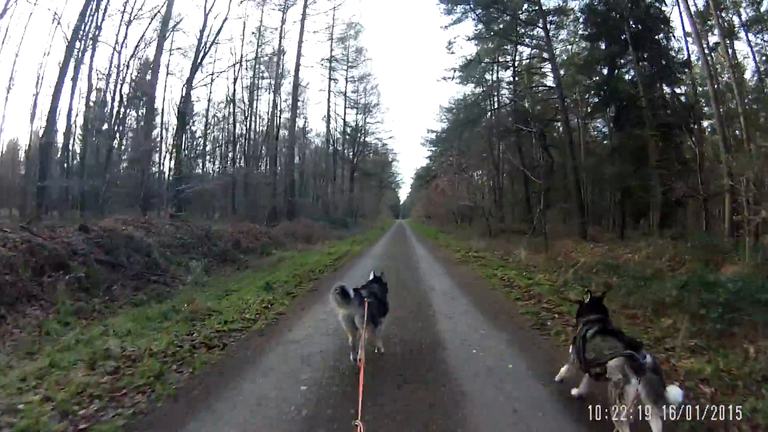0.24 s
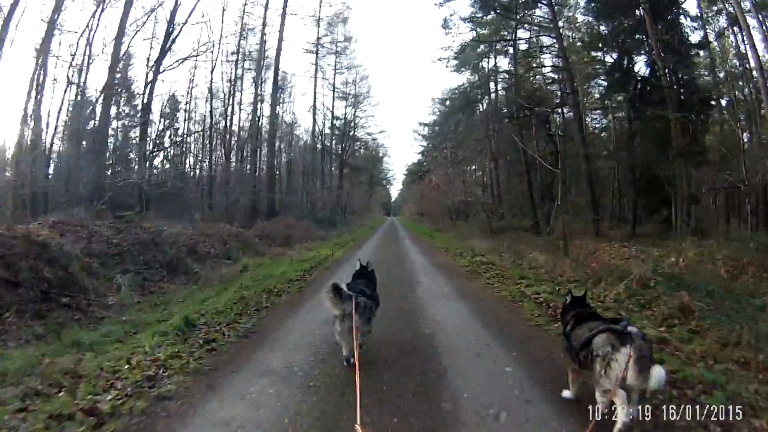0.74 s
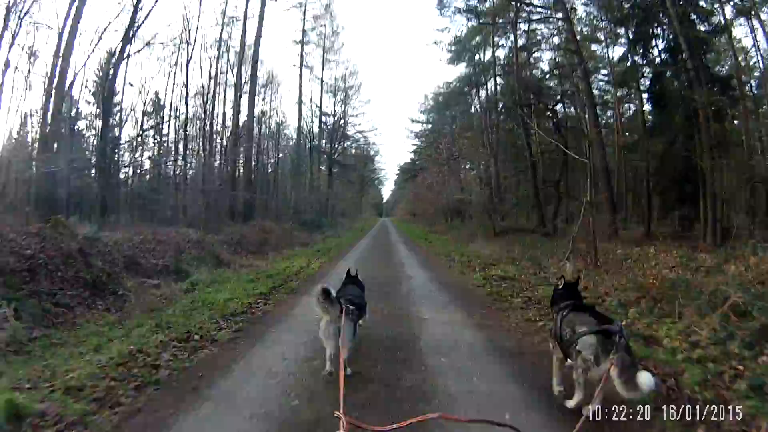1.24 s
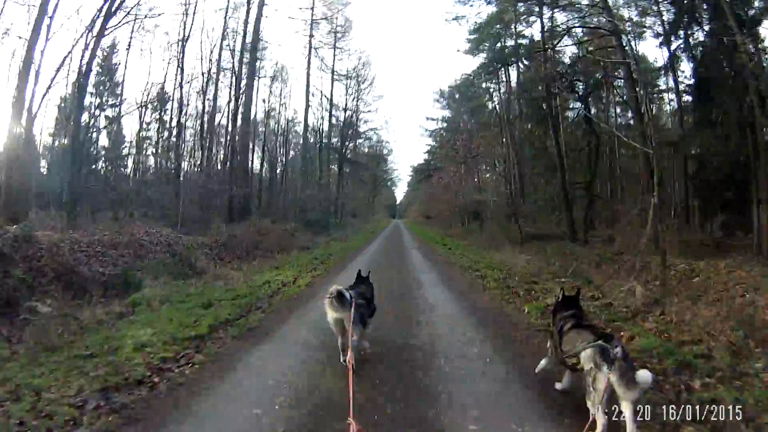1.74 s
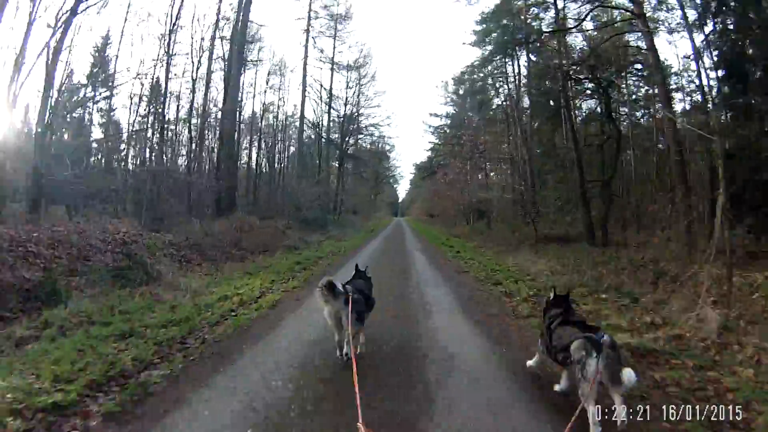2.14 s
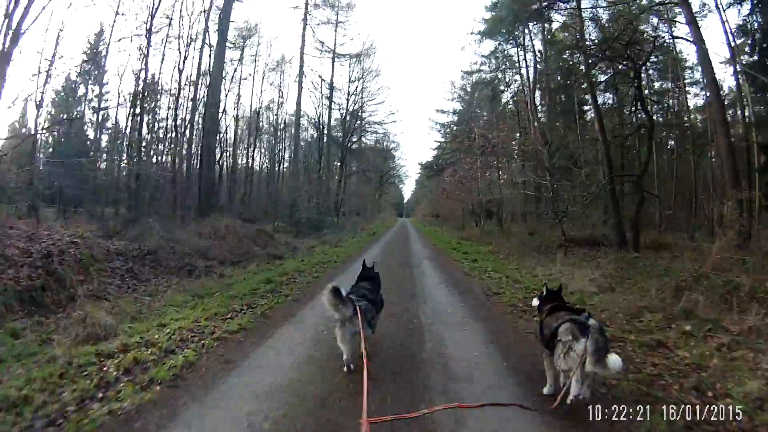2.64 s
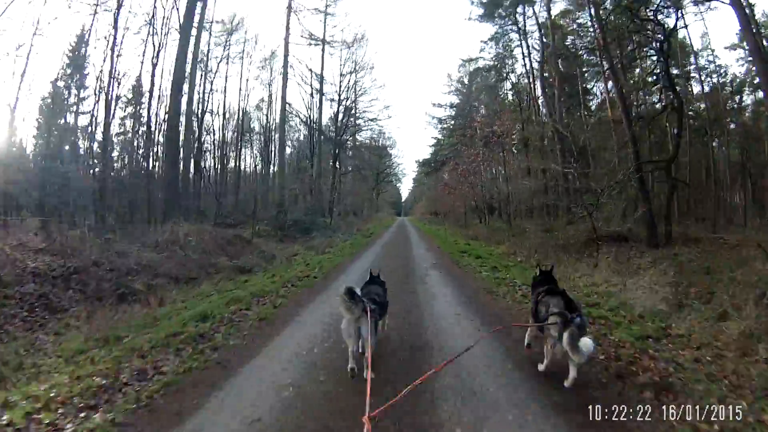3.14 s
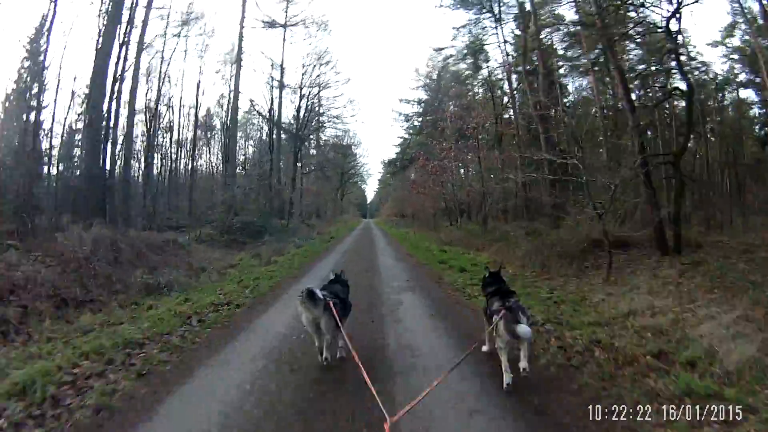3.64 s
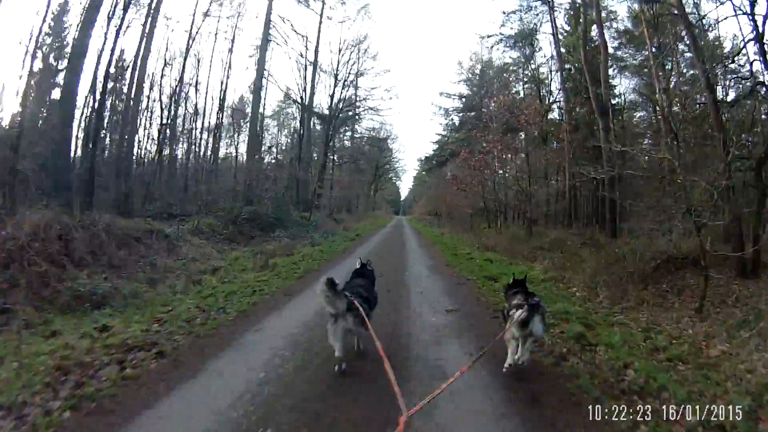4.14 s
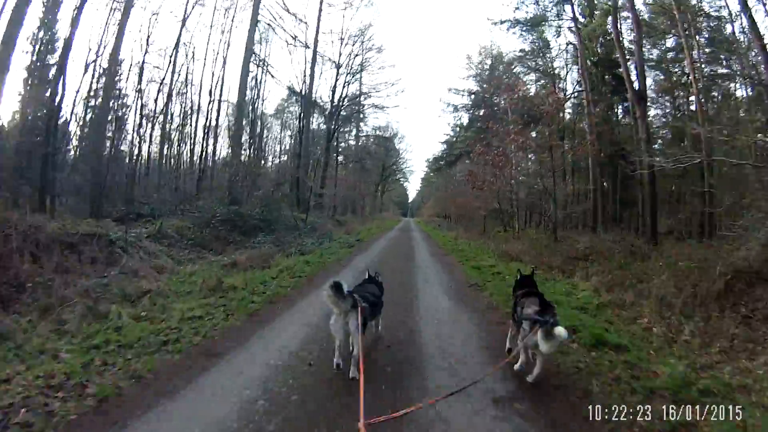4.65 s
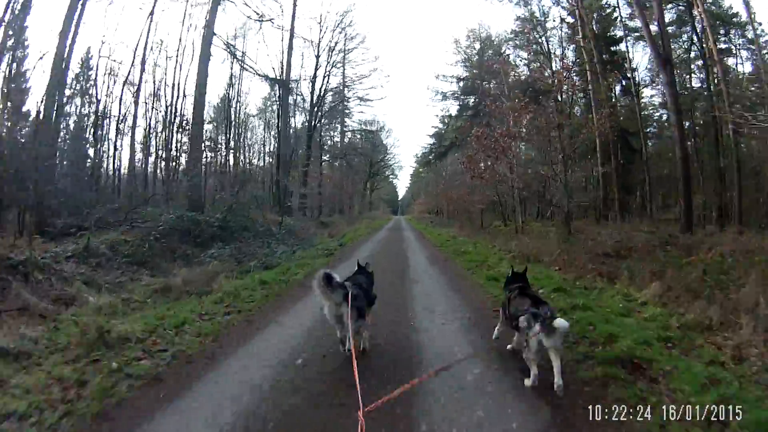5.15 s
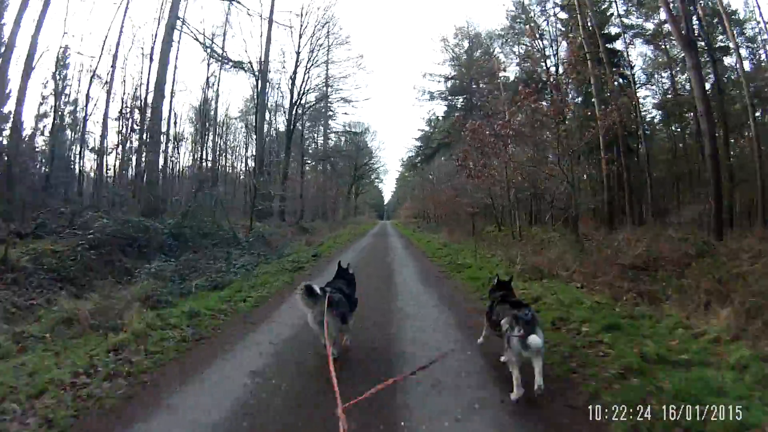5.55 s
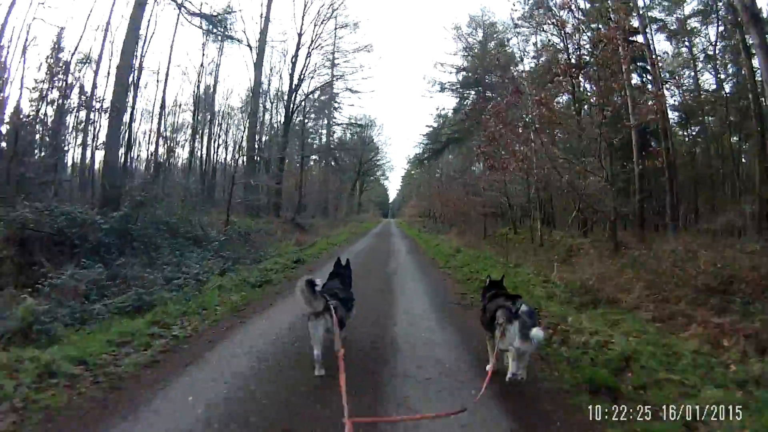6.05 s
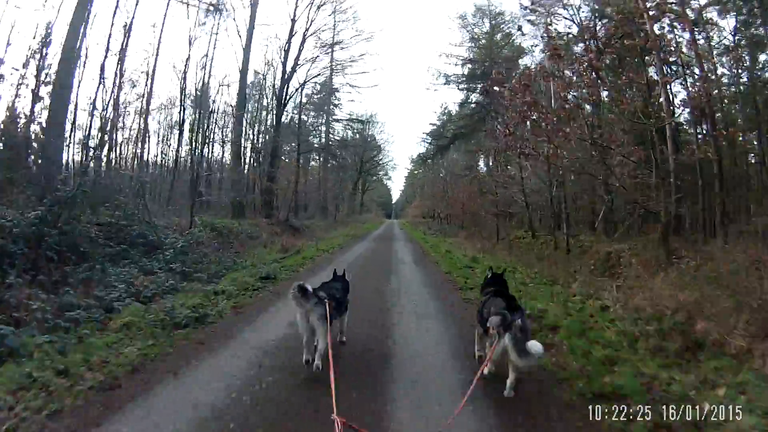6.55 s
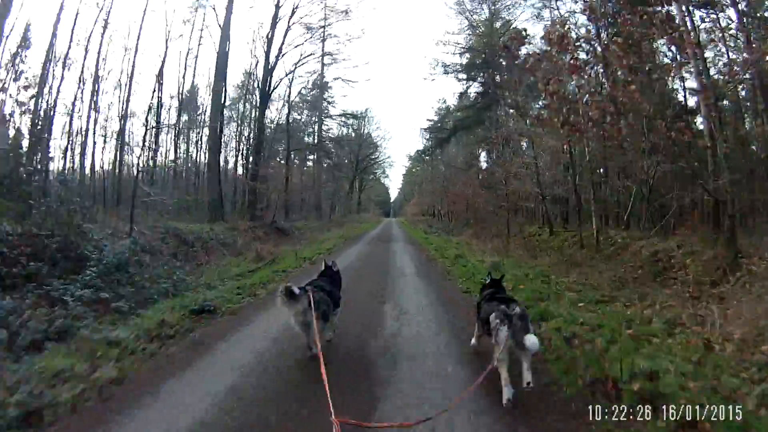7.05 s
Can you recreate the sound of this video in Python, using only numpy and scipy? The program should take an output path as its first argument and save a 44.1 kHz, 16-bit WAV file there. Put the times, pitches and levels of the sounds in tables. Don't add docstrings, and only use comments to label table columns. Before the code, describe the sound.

Low, bumpy tyre rumble with crunching grit, rapid irregular metallic ticks and occasional stone knocks, heard closely from a scooter's handlebar.

```python
import sys
import numpy as np
from scipy import signal
from scipy.fft import rfft, irfft
from scipy.io import wavfile
from scipy.ndimage import uniform_filter1d

SR = 44100
rng = np.random.default_rng(int(sys.argv[2]) if len(sys.argv) > 2 else 0)


def int16_out(signal):
    q = np.round(np.clip(np.atleast_2d(signal).T, -1, 1) * 32767)
    wavfile.write(sys.argv[1], SR, q.astype(np.int16))


def undo_db(level):
    steps = np.asarray(level, float) / 20
    return 10 ** steps


N = 321930

# (time [s], level [dB])
ROAD = [(0.0, -25), (0.04, -29.5), (0.77, -28), (4.63, -28.5), (4.67, -25.5), (4.7, -27), (5.85, -30),
        (5.9, -26.5), (6.89, -30), (7.08, -27), (7.14, -31), (7.3, -28.5)]
# (frequency [Hz], width [Hz], level [dB])
SWAY_MODES = [(43.6, 46, -3), (66.7, 14, -4)]
BOOM_MODES = [(112.3, 8.4, -7.5), (171.2, 17.5, 3.5)]
TUBE_MODES = [(228.2, 37, -5.5), (275, 33, 2), (303.1, 47.4, 5.5), (363, 35, -0.5), (412.3, 18.4, -2),
              (449.2, 18.6, -9.5), (513, 22, -22)]
# (time [s], peak [dB], frequency [Hz])
BUMPS = [(-0.0042, -12, 275), (0.051, -22, 283), (0.56, -43, 289), (0.61, -48, 424), (0.741, -18.5, 297),
         (0.784, -16, 311), (0.824, -17.5, 326), (1.269, -16.5, 316), (1.397, -17, 275),
         (1.591, -18.5, 323), (1.654, -16, 311), (2.041, -20.5, 333), (2.2, -17, 303), (2.495, -24, 283),
         (2.535, -16.5, 311), (2.719, -17, 282), (2.872, -18.5, 275), (3.206, -17, 275), (4.008, -21, 317),
         (4.532, -19.5, 286), (4.659, -14.5, 289), (4.785, -18.5, 288), (5.661, -22, 389),
         (5.862, -22, 280), (6.003, -17.5, 355), (6.149, -25, 287), (6.653, -19, 275), (6.923, -24.5, 365),
         (7.028, -17.5, 307), (2.262, -23, 302), (3.035, -19, 306), (3.79, -21.5, 285), (3.92, -21.5, 309),
         (2.085, -25, 540), (3.16, -26.5, 529), (5.42, -24.5, 400), (.43, -27, 519)]
# (time [s], peak [dB], frequency [Hz])
THUMPS = [(0.101, -26.5, 171), (0.189, -24.5, 161), (0.572, -29, 175), (0.66, -21.5, 175),
          (0.745, -26, 175), (0.983, -25, 156), (1.079, -25, 167), (1.235, -26, 166), (1.493, -30, 159),
          (1.704, -25, 170), (1.846, -25, 166), (2.047, -25, 178), (2.259, -23.5, 170.5), (2.543, -24, 178),
          (2.72, -23, 159.5), (2.891, -25.5, 181), (2.965, -26, 186), (3.44, -24, 178), (3.707, -22, 161.5),
          (3.85, -28, 180), (3.979, -23, 181.4), (4.093, -24, 176), (4.161, -26.5, 148), (4.289, -25, 172),
          (4.431, -27, 173), (4.667, -22, 182), (4.876, -31, 175), (5.004, -31, 161), (5.076, -30, 178),
          (5.198, -24.5, 165), (5.58, -26, 167), (5.751, -28, 168), (5.974, -24, 170), (6.948, -25, 163),
          (7.042, -22, 170), (7.177, -28, 150)]
# (time [s], peak [dB])
RUTS = [(.022, -29.5), (.13, -27), (.281, -29), (.93, -27), (1.03, -30), (1.269, -36), (1.839, -34),
        (2.06, -26.5), (2.25, -33), (2.484, -32.5), (3.43, -29), (3.603, -29), (3.855, -35), (4.11, -32),
        (4.545, -30), (5.29, -35), (5.74, -25), (6.151, -34), (6.462, -30), (6.62, -29), (7.158, -32)]
# (frequency [Hz], density [dB/Hz])
HISS = [(350, -4), (560, 1.5), (700, -0.5), (900, -4.5), (1230, -6), (1500, -9), (3000, -14.5), (3500, -21),
        (5000, -21.5), (5750, -18), (6300, -20.5), (7500, -27), (10000, -29.5), (15300, -30.5)]
# (time [s], level [dB])
LOOSE_GRIT = [(0.0, -49.5), (0.47, -50.5), (1.2, -48.5), (1.95, -53), (3.5, -49), (3.8, -52), (4.65, -50),
              (4.8, -52), (5.53, -50.5), (6.06, -49), (6.34, -51.5), (7.3, -53)]
# (pitch [Hz], level [dB])
GRIT_SIZES = [(650, -6.0), (900, -10.5), (1300, -13.0), (1800, -10.5), (2400, -10.5), (3100, -10.0), (4600, -18)]
# (frequency [Hz], level [dB])
WHINE = [(10519, -80)]
# (time [s], peak [dB])
TICKS = [(0.0388, -45), (0.0528, -25), (0.0977, -35), (0.1161, -29), (0.1815, -22.5), (0.2106, -16.5),
         (0.2615, -16), (0.2902, -31), (0.325, -19), (0.403, -29.5), (0.4583, -21.5), (0.5447, -24.5),
         (0.6404, -25.5), (0.6746, -25), (0.7003, -27.5), (0.7425, -13.5), (0.7934, -29.5),
         (0.925, -25.5), (0.9603, -22.5), (0.9981, -23.5), (1.0306, -30), (1.0764, -25),
         (1.0994, -25.5), (1.1423, -28), (1.267, -23.5), (1.2989, -28), (1.3212, -29), (1.3648, -16),
         (1.3982, -22), (1.4524, -24.5),
         (1.5816, -38), (1.5977, -24.5), (1.6705, -23.5), (1.7153, -24), (1.7528, -25), (1.766, -38),
               (1.8232, -29), (1.8992, -19), (1.9634, -30), (2.063, -25), (2.0858, -24.5), (2.12, -26.5),
               (2.1776, -19.5), (2.2985, -21), (2.3354, -33.5), (2.4412, -28.5), (2.471, -22), (2.515, -34),
               (2.5884, -30), (2.6516, -21), (2.6908, -32.5), (2.7864, -34.5), (2.8843, -30), (2.9083, -18),
               (2.971, -19.5), (3.0152, -29), (3.0877, -24), (3.1479, -17.5), (3.199, -23.5), (3.2537, -27),
         (3.3075, -22), (3.3415, -26), (3.3663, -18), (3.4285, -18.5), (3.4782, -25), (3.6352, -30),
              (3.6928, -25.5), (3.7454, -35), (3.788, -23.5), (3.834, -22.5), (3.883, -32), (3.9486, -21.5),
              (4.058, -24.5), (4.107, -25.5), (4.1429, -33.5), (4.2579, -20.5), (4.3222, -24.5),
              (4.4013, -22.5), (4.44, -19.5), (4.5024, -21), (4.53, -24.5), (4.5846, -23.5), (4.6123, -40),
              (4.7203, -20.5), (4.7686, -21), (4.8049, -20.5), (4.8418, -24), (4.8865, -34), (4.948, -26.5),
              (4.9896, -30.5),
         (5.1098, -21), (5.1407, -25), (5.1874, -24.5), (5.2511, -22.5), (5.323, -30), (5.3891, -18.5),
             (5.453, -15.5), (5.497, -25), (5.5536, -22), (5.5956, -32), (5.662, -31.5), (5.6821, -24.5),
             (5.7209, -20), (5.7648, -33), (5.878, -29), (5.9716, -22.5), (6.145, -26), (6.1931, -27),
             (6.3613, -31.5), (6.4083, -34), (6.461, -31), (6.4923, -28.5), (6.6344, -28.5), (6.7632, -28),
             (6.8218, -23), (6.8606, -27.5), (6.956, -29), (7.0893, -29.5), (7.1641, -31.5),
             (7.2073, -27.5),
         (0.0118, -27.5), (0.471, -19.5), (.7464, -21), (.7559, -35), (1.0793, -22), (0.88, -32),
           (1.196, -34), (6.6565, -43), (6.667, -43), (6.707, -40), (6.7163, -42), (9.4, -35),
           (2.2036, -38), (3.8, -27), (6.3, -39), (6.996, -33.5), (7.2844, -34.5), (4.0222, -31.5),
           (6.0099, -34)]
CHATTER = [.206, 0.232, .4852, .5021, 0.566, .5761, .8417, .877, 1.5117, 1.6286, 2.2626, 2.36, 2.4045,
           2.5529, 2.6134, 2.7301, 2.7447, 2.8406, 2.9276, 3.2851, 3.5394, 4.1725, 4.6523, 5.035, 5.2724,
           5.9263, 6.074, 6.0831, 6.2874, 6.525]
# (time [s], extra brightness [dB])
GLANCING = [(.0123, 6), (.2104, 12), (.7464, 7), (.9981, 8), (1.0762, 10), (1.0793, 25), (1.0993, 15),
            (2.0868, 17), (3.3418, 29), (5.662, -8), (6.0099, -8)]
# (frequency [Hz], level [dB], t60 [s])
BAR_MODES = [(3475, -16, 0.037), (3900, -3, 0.0073), (5008, -16.5, 0.021), (3777, -19, 0.04),
             (6305, -9.5, 0.0096), (6978, 6, 0.0015), (7986, -14, 0.011), (9500, -14, 0.0018),
             (11770, -10.5, 0.0027), (12800, -26, 0.007), (14700, -28.5, 0.0032)]
# (time [s], peak [dB], frequency [Hz])
STONES = [(.264, -30, 1880), (.3526, -35, 1760), (.4083, -33.5, 2030), (.7457, -26, 2400),
          (1.143, -32, 2300), (1.389, -31, 1260), (1.5821, -29, 2350), (1.667, -9, 2500),
          (1.683, -29, 1880), (1.7674, -6.5, 1850), (1.7768, -19, 2300), (2.0129, -34, 2170),
          (2.0782, -28, 2410), (2.0966, -24, 1770), (2.6012, -26.5, 2330), (3.451, -33, 1950),
          (3.5444, -22, 1900), (4.0792, -27, 2180), (4.1058, -31, 2010), (4.1663, -26, 2390),
          (4.613, -29, 2320), (4.653, -31, 2310), (5.2155, -26.5, 2220), (5.809, -27.5, 2650),
          (5.8866, -22.5, 2460), (5.891, -22, 2340), (5.9318, -25, 2370), (5.965, -27, 2270),
          (6.1798, -26.5, 2170), (6.2565, -33, 2060), (.349, -31, 2850), (.598, -35, 2260),
          (1.042, -36, 2800), (1.153, -34, 3000), (1.7539, -38, 1890), (2.2463, -33, 2820),
          (4.3036, -31, 2740), (4.4024, -33, 2460), (6.777, -33, 1950), (6.9197, -32, 2020),
          (7.144, -37, 2500), (7.194, -32.5, 3100), (7.247, -30, 2900), (2.0083, -31, 2940),
          (5.6605, -28, 2480)]
PEBBLES = [.0392, 1.317, 1.367, 1.377, 1.6279, 2.01, 2.017, 2.159, 2.1896, 2.821, 3.0848, 3.557, 4.339,
           4.5648, 4.5746, 4.6608, 5.453, 5.9278, 5.9792, 7.0531, 7.213]
# (time [s], peak [dB], frequency [Hz])
FLICKS = [(0.0613, -32, 2550), (0.0674, -39, 2780), (0.1391, -45, 2530), (0.1545, -41, 2000),
          (0.2307, -37, 2420), (0.294, -39, 2560), (1.0554, -44, 2890), (1.066, -36, 2400),
          (1.1664, -42, 2550), (1.6277, -32, 2200), (2.73, -35, 2450), (2.9057, -33, 3160),
          (3.0214, -38, 2640), (3.1884, -35, 2480), (3.2655, -42, 2580), (5.6496, -28, 2200),
          (5.6972, -35, 2260), (5.7864, -33, 2460), (5.8124, -33, 3050), (5.8254, -46, 2320),
          (5.8346, -38, 2530), (5.8616, -40, 2830), (5.9426, -28, 2660), (6.0447, -43, 2950),
          (6.0911, -37, 2380), (6.2123, -37, 2770), (6.7414, -44, 2500), (7.0379, -37, 2260),
          (7.1776, -38, 2220)]
# (time [s], peak [dB], frequency [Hz], t60 [s])
KNOCKS = [(0.21, -20, 890, 0.024), (0.471, -25, 854, 0.043), (0.641, -27.5, 1193, 0.047),
          (0.824, -28.5, 1060, 0.037), (1.193, -24, 1230, 0.014), (1.273, -30, 1670, 0.036),
          (1.592, -19, 1845, 0.03), (2.085, -20.5, 2250, 0.017), (3.205, -27, 1140, 0.035),
          (4.005, -30.5, 956, 0.02), (5.156, -27, 1105, 0.032), (5.663, -19.5, 1246, 0.022),
          (6.015, -32, 830, 0.056), (6.482, -22, 1170, 0.039), (6.846, -26, 1760, 0.024),
          (7.067, -26.5, 2180, 0.03), (7.229, -25.5, 2173, 0.043), (7.233, -27, 2094, 0.04),
          (1.387, -32, 1270, 0.033), (2.183, -36, 990, 0.034), (2.302, -38, 1210, 0.037),
          (2.613, -32, 880, .03), (2.885, -35.5, 950, 0.038), (3.341, -31, 1260, .035),
          (3.952, -35, 1230, .04), (5.716, -35, 1210, .04), (6.016, -37, 1200, 0.045),
          (6.68, -36, 1130, .04), (6.95, -36.5, 1205, .1), (1.825, -40, 1200, .12), (5.03, -40, 1196, .12),
          (2.09, -29, 900, .02)]
# (time [s], peak [dB], frequency [Hz],
# t60 [s])
CLIPS = [(.268, -54, 7480, 0.051), (.752, -43, 7800, 0.044), (6.49, -56, 7700, .09),
         (5.903, -48, 5100, .03), (.838, -56, 9600, .09), (1.08, -54, 12300, .03), (3.1, -60, 9600, 0.1),
         (6.6, -46, 6600, .05), (7.221, -64, 9700, .04), (1.124, -56, 6000, .03), (1.18, -64, 7500, .08),
         (6.947, -48, 6100, .025), (.229, -48, 5000, .03), (1.0795, -22, 7300, .015),
         (7.052, -43, 6300, .012)]
DROPOUT_HZ = (13000, 13800, 14400, 14900)
DROPOUT_BELOW = (-2, -1.5, -1.1, -.5)

TUBE_DB, SWAY_DB, BOOM_DB, GRIT_DB = -1.5, -12, -5.5, 2
THUMP_DB, THUMP_T60_S = -1.5, 0.26
RUT_HZ, RUT_T60_S = 67.8, 0.55
LOAD_TOP = 1.47
DECK_TOP_HZ = 3800
TICK_DB, BRIGHT_DB, BRIGHT_PER_DB, DULLEST_DB = 2, -0.5, 1.08, -27
BOUNCE_S, BOUNCE_DB, BOUNCE_SPREAD_DB = 0.0097, -30, 3.5
CHATTER_DB, CHATTER_SPREAD_DB = -36, 2.5
CRACKLE_PER_S, CRACKLE_DB = 14, -45
COLOUR_SPREAD_DB, TILT_TOP_HZ = 1.5, 8500
EDGE_HZ, EDGE_PER_DB = 10500, 0.5
SCATTER = 0.043
PEBBLE_DB, PEBBLE_HZ, PEBBLE_SPREAD = -32.5, 2290, 0.078
FLICK_DB = 1.5
STONE_TURNS, TURNS_PER_DB, SHORTEST_TURNS = 0.47, 0.1043, 0.6
KNOCK_SNAP_DB, KNOCK_SNAP_RISE = 0.5, 0.77
TOP_HZ, DROPOUT_PER_S = 15150, 60


def curve(table, column):
    rows = np.array(table)
    return np.interp(np.arange(N) / SR, rows[:, 0], rows[:, column])


def unit(x):
    return x / np.sqrt(np.mean(x ** 2))


def band(x, hz, width_hz):
    return signal.lfilter(*signal.iirpeak(hz, hz / width_hz, fs=SR), x)


def steep(x, hz, kind, order=4):
    return signal.sosfilt(signal.butter(order, hz, kind, fs=SR, output="sos"), x)


def ring(hz, t60_s, late_s=0., rise_s=1e-5, size=4096):
    t = np.maximum(np.arange(size) / SR - late_s, 0)
    decay = np.exp(-np.log(1000) * t / t60_s)
    return np.sin(2 * np.pi * hz * t) * decay * (1 - np.exp(-t / rise_s)) ** 2


def snap(hz, turns):
    t = np.arange(-128, 128) / SR
    return np.sin(2 * np.pi * hz * t) * np.exp(-(2 * hz * t / turns) ** 2)


def add(out, s, sound):
    i = int(s * SR)
    sound = sound[max(-i, 0):]
    i = max(i, 0)
    out[i:i + len(sound)] += sound[:len(out) - i]


def walk(rate_hz):
    hold = int(SR / rate_hz)
    steps = np.repeat(rng.standard_normal(N // hold + 1), hold)
    return unit(uniform_filter1d(steps, hold)[:N])


def grit(rate_hz, spread_db):
    chance = rng.random((N, 2))
    size = undo_db(np.minimum(-spread_db * np.log(chance[:, 1] + 1e-9), 12))
    return (chance[:, 0] < rate_hz / SR) * size * rng.standard_normal(N)


def frame():
    push = grit(rate_hz=900, spread_db=1.5)
    push = np.append(push[-SR // 4:], push)
    out = np.zeros(N)
    for modes, part_db in ((TUBE_MODES, TUBE_DB), (SWAY_MODES, SWAY_DB), (BOOM_MODES, BOOM_DB)):
        part = 0
        for hz, width_hz, db in modes:
            mode = band(band(push, hz, 1.91 * width_hz), hz, 1.94 * width_hz)
            part = part + undo_db(db) * unit(mode)
        part = steep(part, 522, "low", order=10)[-N:]
        out += undo_db(curve(ROAD, column=1) + part_db) * unit(part)
    jolts = np.zeros(N + SR)
    for s, db, hz in BUMPS:
        jolt = ring(hz, 0.14, rise_s=0.00034) + 0.45 * ring(437, 0.084, rise_s=0.00073)
        add(jolts, s + .1, undo_db(db - 0.5) * jolt)
    for s, db, hz in THUMPS:
        add(jolts, s + .095, undo_db(db + THUMP_DB) * ring(hz, THUMP_T60_S, rise_s=0.0053, size=8192))
    for s, db in RUTS:
        add(jolts, s + .09, undo_db(db) * ring(RUT_HZ, RUT_T60_S, rise_s=0.012, size=16384))
    return out + steep(jolts, 596, "low", order=8)[SR // 10:][:N]


def housing_hiss():
    hz = np.fft.rfftfreq(N, 1 / SR)
    table = np.array(HISS)
    colour = undo_db(np.interp(np.log(hz + 1), np.log(table[:, 0]), table[:, 1]))
    hiss = irfft(rfft(rng.standard_normal(N)) * colour, N)
    hiss /= np.std(steep(hiss, [700, 3000], "band"))
    return undo_db(-54 + 1.4 * walk(16)) * hiss


def gravel(shaking):
    load = unit(uniform_filter1d(np.abs(shaking), size=500)) ** 1.2
    load = np.minimum(load, LOAD_TOP)
    clumps = undo_db(curve(LOOSE_GRIT, column=1) + GRIT_DB + 1.1 * walk(25)) * load
    cracks = 0
    for pitch_hz, db in GRIT_SIZES:
        burst = np.convolve(grit(rate_hz=300, spread_db=1.9), snap(pitch_hz, 1.23), "same")
        crumble = band(burst, pitch_hz, .12 * pitch_hz)
        burst = steep(burst, max(DECK_TOP_HZ, 1.3 * pitch_hz), "low", order=5)
        cracks = cracks + undo_db(db + 1.46 * walk(40)) * unit(unit(burst) + 0.59 * unit(crumble))
    deck = unit(band(cracks, 1180, 85))
    return clumps * (cracks + undo_db(-9.5) * deck)


def electronics():
    hz, db = WHINE[0]
    return undo_db(db + 3.0) * np.sin(2 * np.pi * hz * np.arange(N) / SR)


def contacts():
    s, db = np.array(TICKS).T
    luck = rng.standard_normal((2, len(s)))
    bounce_s = s + BOUNCE_S * (1 + 0.1 * luck[0])
    bounce_db = db + TICK_DB + BOUNCE_DB + BOUNCE_SPREAD_DB * luck[1]
    faint_db = CHATTER_DB + CHATTER_SPREAD_DB * np.clip(rng.standard_normal(len(CHATTER)), -1, 1)
    brush = rng.random((2, int(CRACKLE_PER_S * N / SR)))
    s = np.concatenate([s, bounce_s, CHATTER, brush[0] * N / SR])
    db = np.concatenate([db + TICK_DB, bounce_db, faint_db, CRACKLE_DB - 5 * brush[1]])
    bright_db = np.maximum(BRIGHT_DB + BRIGHT_PER_DB * db, DULLEST_DB)
    for at_s, extra_db in GLANCING:
        bright_db[np.argmin(np.abs(s - at_s))] += extra_db
    return np.array([s, db, bright_db]).T


def fitting():
    out = np.zeros(N)
    ticks = contacts()
    shakes = rng.standard_normal((len(ticks), 2, len(BAR_MODES)))
    scatter = rng.standard_normal((len(ticks), 512)) * np.exp(-np.arange(512) / (0.0036 * SR))
    blows = np.zeros(2048)
    add(blows, .00067, 0.2 * snap(4440, 4.4))
    add(blows, .0014, 1.32 * snap(4740, 2.05))
    for (s, db, bright_db), (shake, bend), tail in zip(ticks, shakes, scatter):
        tick = blows.copy()
        for k, (hz, mode_db, t60_s) in enumerate(BAR_MODES):
            tilt_db = 0.46 * (bright_db + 16.5) * np.log2(min(hz, TILT_TOP_HZ) / 4500)
            if hz > EDGE_HZ:
                tilt_db = EDGE_PER_DB * (db + 15.5)
            late_s = 0.002193 + 0.0014926 * np.sqrt(4000 / hz)
            size = min(int((late_s + t60_s) * SR), len(tick))
            mode = ring(hz + bend[k] / (6 * t60_s), t60_s, late_s, 0.00026, size)
            add(tick, 0, (-1) ** k * undo_db(mode_db + tilt_db + COLOUR_SPREAD_DB * shake[k]) * mode)
        echo = signal.fftconvolve(tick[100:260], tail)
        tick[140:] += SCATTER * echo[np.minimum(np.arange(1908), 670)]
        add(out, s - .0032, undo_db(db + 0.5) * tick / np.abs(tick).max())
    return steep(out, 3110, "high", order=10)


def light_stones():
    out = np.zeros(N)
    fade = np.exp(-np.arange(1024) / (0.0064 * SR))
    hits = STONES + [(s, db + FLICK_DB, hz) for s, db, hz in FLICKS]
    for s in PEBBLES:
        a, b = rng.standard_normal(2)
        hits = hits + [(s, PEBBLE_DB + 1.3 * a, PEBBLE_HZ * (1 + PEBBLE_SPREAD * b))]
    for s, db, hz in hits:
        turns = max(STONE_TURNS - TURNS_PER_DB * (db + 15), SHORTEST_TURNS)
        add(out, s - .0019, undo_db(db + 1.0) * snap(hz, turns))
        scrape = steep(rng.standard_normal(1024) * fade, [900, 3500], "band", order=2)
        add(out, s, undo_db(db - 22) * scrape)
    return steep(out, DECK_TOP_HZ, "low", order=5)


def heavy_stones():
    out = np.zeros(N)
    fade = np.exp(-np.arange(1024) / (0.0064 * SR)) ** 1.34
    for s, db, hz, t60_s in KNOCKS:
        crush_hz = [0.65 * hz, min(2.86 * hz, 3100)]
        crush = steep(rng.standard_normal(1024) * fade, crush_hz, "band", order=3)
        add(out, s, undo_db(db + 0.5) * crush)
        add(out, s, undo_db(db + KNOCK_SNAP_DB) * snap(min(KNOCK_SNAP_RISE * hz, 2200), 0.49))
        add(out, s, undo_db(db - 1) * ring(hz, t60_s, rise_s=0.0017))
    return steep(out, DECK_TOP_HZ, "low", order=5)


def harness_clips():
    out = np.zeros(N)
    for s, db, hz, t60_s in CLIPS:
        add(out, s, undo_db(db) * ring(hz, t60_s, rise_s=0.00077))
    return out


def scene():
    shaking = frame()
    ground = shaking + housing_hiss() + gravel(shaking) + electronics()
    return (ground + fitting() + light_stones() + heavy_stones() + harness_clips())[None]


def top_cut(x):
    return signal.sosfilt(signal.butter(12, 15890, fs=SR, output="sos"), x)


def record(dry):
    notched = dry - .85 * band(dry, 5770, 420)
    housed = steep(notched, TOP_HZ, "low", order=24)
    for hz, below in zip(DROPOUT_HZ, DROPOUT_BELOW):
        top = signal.sosfiltfilt(signal.butter(10, hz, "high", fs=SR, output="sos"), housed)
        quiet = uniform_filter1d(np.abs(top), size=256) < 2 * np.median(np.abs(top))
        lost = 1. * quiet * (walk(DROPOUT_PER_S) < below)
        housed = housed - top * uniform_filter1d(lost, size=128)
    return top_cut(housed)


dry = scene()
out = record(dry)
int16_out(out)
```